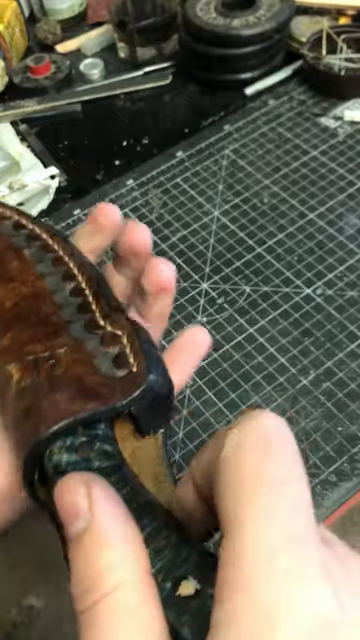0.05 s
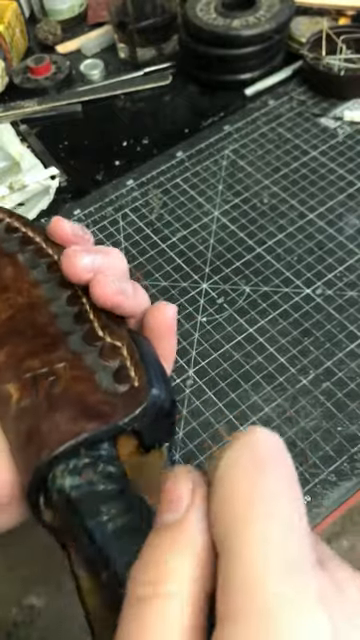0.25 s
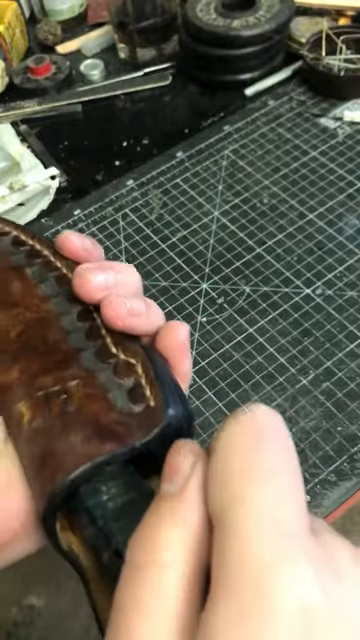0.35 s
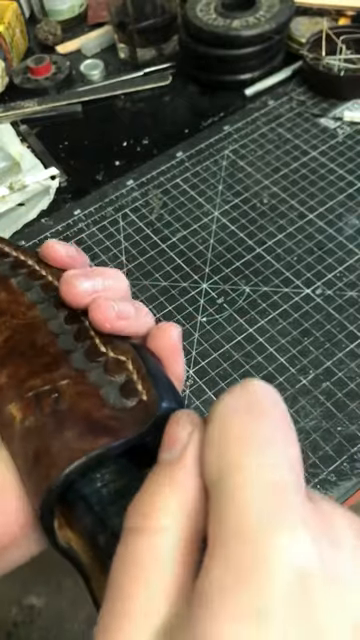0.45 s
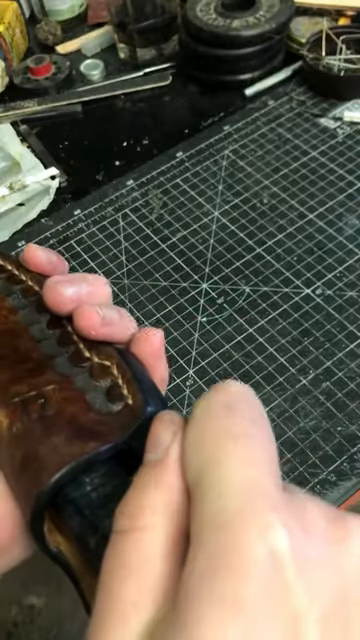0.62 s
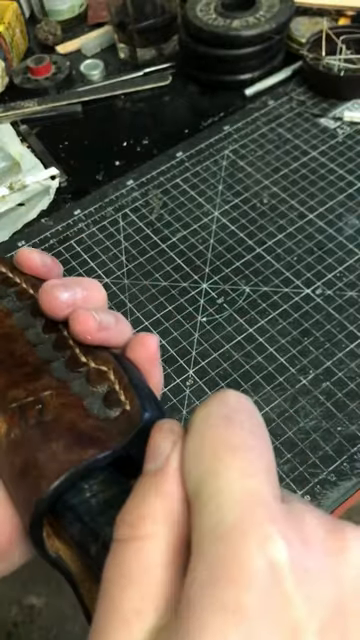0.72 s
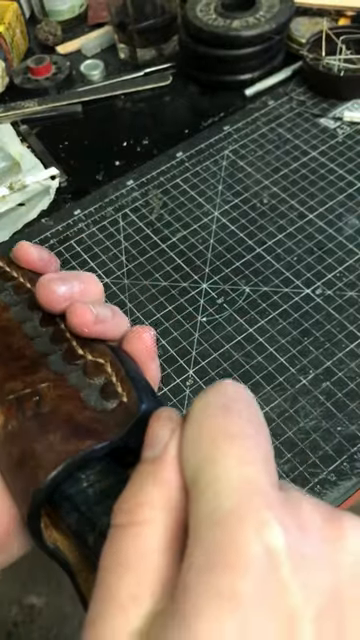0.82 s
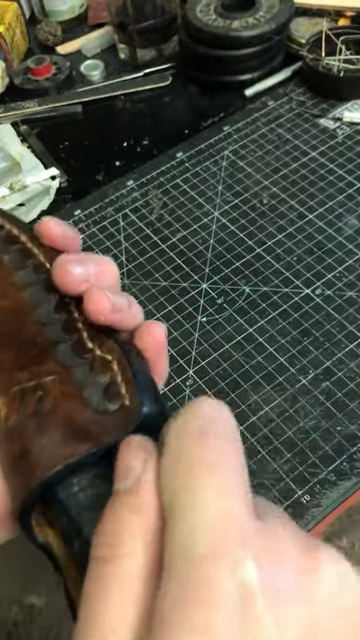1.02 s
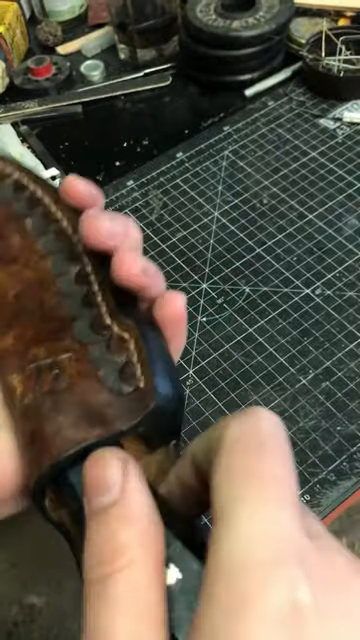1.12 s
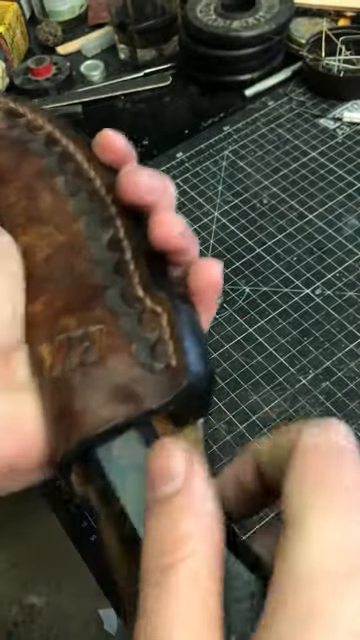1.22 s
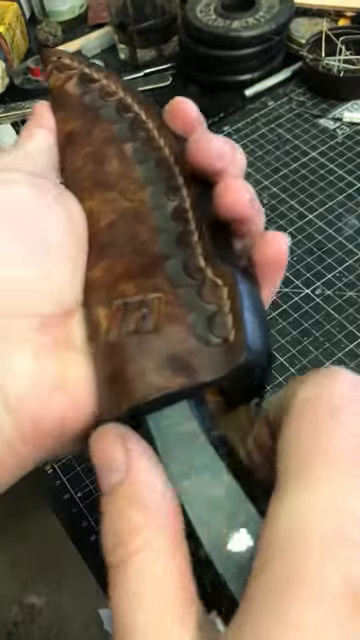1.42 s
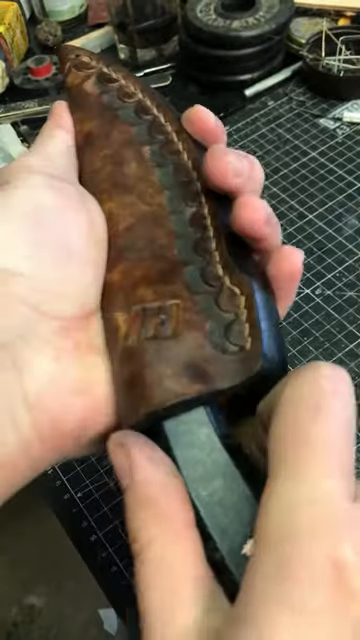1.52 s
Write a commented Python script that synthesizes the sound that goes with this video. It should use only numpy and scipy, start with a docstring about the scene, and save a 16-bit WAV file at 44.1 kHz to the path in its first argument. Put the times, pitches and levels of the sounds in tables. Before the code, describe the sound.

A knife slides into a stiff leather sheath and seats with three sharp snaps.

```python
"""A small workshop, close up over the bench: a knife is pushed into a stiff leather sheath.
The blade hisses over the fibres, catches three times, rasps in tighter and seats with three sharp snaps,
each a slip that cracks, rings the sheath's mouth and thumps its body. Then the fingers shift softly
and ease the blade back out. The room answers with a short tail over a low rumble."""
import sys
import numpy as np
from scipy import signal
from scipy.fft import rfft, irfft, next_fast_len
from scipy.io import wavfile
from scipy.ndimage import map_coordinates

SR = 44100
rng = np.random.default_rng(int(sys.argv[2]) if len(sys.argv) > 2 else 0)


def inscribe(sig):
    """Save sig as 16-bit PCM at rate SR to the path in sys.argv[1].

    A 1-D sig is mono; a 2-D sig holds one channel per row.
    Samples are clipped to [-1, 1] before scaling.
    """
    pcm = np.round(np.clip(np.atleast_2d(sig).T, -1, 1) * 32767)
    wavfile.write(sys.argv[1], SR, pcm.astype(np.int16))


N = 68355

# The knife catches and slips; levels are faders ahead of each layer's shaping:
# (time [s], crack [dB], crack tilt [dB/octave], high cut [Hz], ping [dB], ping pitch [Hz], mouth [dB],
#  thump [dB], thump pitch [Hz], hollow [dB], hollow pitch [Hz], room send [dB])
SLIPS = [(0.2138, -35.5, 0.5, 17200, -21.5, 4420, -24.5, -34.5, 615, -35.5, 1187, -20.5),
         (.2631, -31.5, 0, 16000, -24.5, 3100, -29, -34.5, 550, -37.5, 1170, -20),
         (0.2805, -48, 2, 13000, -29.5, 4200, -46, -49, 610, -45, 1220, -53),
         (0.284, -33, -1, 16000, -30, 3100, -29, -32.5, 970, -36.5, 1370, -14.5),
         (0.2864, -33, -0.5, 19000, -31, 14200, -32, -34, 1050, -31.5, 1410, -24),
         (0.4492, -36, 20, 19000, -31, 15000, -62, -74, 700, -70, 1200, -34),
         (0.45, -21.5, 1, 16900, -13, 9160, -20.5, -22, 750, -31.5, 1640, -9.5),
         (0.6137, -20.5, -.5, 18000, -17.5, 11150, -20, -18.5, 707, -24, 1187, -10),
         (0.8248, -28, -.5, 12700, -25, 6300, -29.5, -24, 554, -41, 1250, -17)]
# The sheath's stiff mouth and its leather body ringing: (pitch [Hz], level [dB], t60 [s])
MOUTH_MODES = [(2190, -18, 0.0089), (2640, -16.5, 0.015), (3626, -0.5, 0.0093), (3890, -4, 0.0079),
               (4526, -6, 0.0069), (6580, -4.5, 0.0044), (9600, -12.5, 0.0078)]
BODY_MODES = [(313.5, -23, 0.04), (530, -19, 0.0063), (860, -14.5, 0.019)]
# EQ of a crack up close, and of a snap as the walls receive it: (frequency [Hz], level [dB])
CRACK_EQ = [(300, -17.5), (1000, 3), (1700, 0.5), (2400, 4.5), (3500, -2), (5200, 1), (6500, 6),
            (8000, -10.5), (10000, -3.5), (13000, 1.5), (16000, -3)]
SNAP_SEND_EQ = [(100, -30), (280, 0), (500, 0), (900, 1), (1400, -1.5), (2000, -4.5), (3600, -4),
                (5200, -9.5), (6500, -9.5), (9000, -17.5), (13000, -16), (16000, -22)]
# Envelopes of the blade sliding in loosely, rasping tight and easing out: (time [s], level [dB])
SLIDE_ENVELOPE = [(0, -54.5), (.04, -53.5), (.07, -52.5), (.108, -52), (.15, -60.5), (.2, -71.5),
                  (.22, -58), (.26, -66), (.29, -79)]
RASP_ENVELOPE = [(.28, -86), (.295, -53.5), (.315, -46.5), (.345, -49.5), (.368, -50), (.388, -45.5),
                 (.398, -52), (.408, -77), (.44, -75)]
DRAW_ENVELOPE = [(1.39, -81), (1.43, -70), (1.465, -80), (1.51, -75), (1.55, -68)]
# EQ of the same three moves: (frequency [Hz], level [dB])
SLIDE_EQ = [(100, -20), (250, -9), (450, -4), (800, -7.5), (1300, -4.5), (2100, -14), (2700, -1.5),
            (3500, -2), (4600, -4.5), (5300, -5.5), (6400, -5), (8500, -9.5), (11800, -5), (16000, -8.5)]
RASP_EQ = [(59, -29), (100, 6.5), (166, -18), (244, -6.5), (365, -28), (461, 4.5), (524, -15), (818, -6),
           (910, -5), (1250, 2), (1580, -6), (3250, -1.5), (4980, -9.5), (6420, -10), (16000, -10.5)]
DRAW_EQ = [(300, -9), (1200, -7), (2200, -8.5), (2900, -6), (3450, 1.5), (4200, -8.5), (5200, -13),
           (9000, -19), (16000, -21)]
# Fingers and handle rub the leather: (centre [s], half length [s], level [dB], tilt [dB/octave])
FINGER_RUBS = [(.385, 0.0099, -51, -8), (.4457, .001, -61, 1), (.605, 0.0011, -60, 3),
               (.993, 0.0014, -62.5, 7), (1.1, .04, -68, 4), (1.152, 0.0026, -59.5, 2),
               (1.169, 0.0058, -60.5, 2), (1.22, 0.015, -69, 1), (1.287, 0.0062, -65, 0.5),
               (1.302, 0.0088, -64.5, 6), (1.445, 0.0085, -68.5, 0), (1.49, .012, -67.5, 4.5),
               (1.545, 0.0091, -67, 1)]
# The hands jostle the sheath: (centre [s], half length [s], level [dB])
HAND_BUMPS = [(.39, .02, -70), (.475, 0.017, -58.5), (.635, 0.017, -56.5), (.85, 0.014, -54),
              (.945, 0.039, -60), (1.015, 0.031, -61), (1.095, 0.0094, -61), (1.15, .02, -62),
              (1.38, 0.009, -60), (1.53, 0.015, -60)]
# EQ of the rubs, the bumps, the reverb and the background rumble: (frequency [Hz], level [dB])
RUB_EQ = [(60, -19), (200, -3), (600, 1.5), (1300, 2), (2100, -11), (3400, -6.5), (5000, -13), (9000, -18),
          (14000, -15), (16000, -17.5)]
BUMP_EQ = [(25, -43), (50, -6), (70, 10), (100, -17), (170, -20.5), (350, -31), (1000, -80), (4000, -120)]
ROOM_EQ = [(100, -1.5), (400, -1), (1400, 0), (3500, -2), (8000, -1), (15000, 1.5)]
RUMBLE_EQ = [(15, -37), (25, -16.5), (80, 2), (195, -9.5), (354, -11.5), (439, -14.5), (1020, -18.5),
             (1190, -23), (2910, -25), (3620, -27), (7710, -30), (14400, -31.5), (16000, -32)]
# The workshop's reverb time: (frequency [Hz], t60 [s])
ROOM_DECAY = [(150, 0.6), (700, 0.44), (2000, 0.36), (5000, 0.3), (14000, 0.25)]

CRACK_T60_S, SPLINTER_T60_S, SPLINTER_DB, SPIKE_DB = 0.0022, 0.014, -6.5, 9.5
PING_T60_S, THUMP_T60_S, HOLLOW_T60_S = 0.0022, 0.0049, 0.01
ATTACK_S, THUMP_LAG_S = 0.00029, 0.00052
MOUTH_CUT_HZ, BODY_CUT_HZ = 1320, 358  # small parts radiate little bass
BEND_DELAY_S, BEND_LOW_HZ = 0.00196, 516  # travel time at 1 kHz; no slower below this pitch
GRAINS_PER_S, FIZZ_HZ = 1600, 7700
ROOM_RISE_S, RUSTLE_SEND_DB, RUMBLE_DB, TOP_HZ = 0.00152, -12.5, -66, 16300


def snaps():
    """Each slip cracks and rings the mouth; the leather thumps, its hollow rings. Gives (direct, send)."""
    direct, send = np.zeros(N + SR), np.zeros(N + SR)
    t = np.arange(SR // 10) / SR
    late = np.maximum(t - THUMP_LAG_S, 0)
    for (time_s, crack_db, tilt_db, top_hz, ping_db, ping_hz, mouth_db,
         thump_db, thump_hz, hollow_db, hollow_hz, send_db) in SLIPS:
        crack = amp(crack_db) * leather_crack(t, tilt_db)
        ping = amp(ping_db) * ring(t, ping_hz, PING_T60_S) * attack(t)  # the contact point itself
        mouth = amp(mouth_db) * sum((-1) ** k * amp(db + rng.normal(0, 1)) * ring(t, hz, t60)
                                    for k, (hz, db, t60) in enumerate(MOUTH_MODES))
        body = sum(amp(db) * ring(late, hz, t60) for hz, db, t60 in BODY_MODES)
        thump = amp(thump_db) * (ring(late, thump_hz, THUMP_T60_S) + body)
        hollow = amp(hollow_db) * ring(late, hollow_hz, HOLLOW_T60_S)
        bite = high_cut(crack + low_cut(mouth + ping, MOUTH_CUT_HZ), top_hz)
        weight = low_cut((thump + hollow) * attack(late), BODY_CUT_HZ)
        start = round(time_s * SR)
        direct[start:start + len(t)] += bending_wave(bite + weight)
        splash = impulse(tilted(SNAP_SEND_EQ, tilt_db))
        send[start:start + len(splash)] += amp(send_db) * splash
    return direct[:N], send[:N]


def leather_crack(t, tilt_db):
    """The leather lets go: a spike, a fast burst of noise and a splintery tail."""
    envelope = fade(t, CRACK_T60_S) + amp(SPLINTER_DB) * fade(t, SPLINTER_T60_S)
    burst = rng.standard_normal(len(t)) * envelope
    burst[0] = amp(SPIKE_DB)
    return signal.lfilter(impulse(tilted(CRACK_EQ, tilt_db)), 1, burst)


def bending_wave(x):
    """High bending waves cross the sheath faster, so a snap's top end arrives first."""
    hz = np.fft.rfftfreq(2 * len(x), 1 / SR)
    delay = BEND_DELAY_S * np.sqrt(1000 / np.maximum(hz, BEND_LOW_HZ))
    phase = 2 * np.pi * hz[1] * np.cumsum(delay - delay[-1])
    return irfft(rfft(x, 2 * len(x)) * np.exp(-1j * phase))[:len(x)]


def blade_friction(envelope, eq, grain_db, fizz_db_per_db):
    """Steel drags over catching leather fibres: a grainy hiss that brightens as it swells."""
    fibres = map_coordinates(rng.standard_normal(N), [np.arange(N) * GRAINS_PER_S / SR])
    level_db = np.interp(np.arange(N) / SR, *np.transpose(envelope), right=-120)
    hiss = unit(amp(grain_db * fibres) * noise(eq))
    fizz = signal.sosfiltfilt(signal.butter(2, FIZZ_HZ, "high", fs=SR, output="sos"), hiss)
    fizz_gain = amp(fizz_db_per_db * (level_db - level_db.max()))
    return amp(level_db) * (hiss + fizz * (fizz_gain - 1))


def handling(touches, eq):
    """Soft contacts of the hands: bell-shaped swells of noise, tilted where the row gives a tilt."""
    out, t = np.zeros(N), np.arange(N) / SR
    for centre_s, half_s, db, *tilt in touches:
        swell = np.exp(-0.5 * ((t - centre_s) / half_s) ** 2)
        out += amp(db) * swell * noise(tilted(eq, *tilt) if tilt else eq)
    return out


def workshop_reverb(send):
    """The walls' diffuse answer, highs dying first; each stretch of sound gets a fresh tail."""
    out, stretch = np.zeros(N + 2 * SR), SR // 7
    for start in range(0, N, stretch):
        hz, t, bands = signal.stft(rng.standard_normal(SR // 2), SR, nperseg=256)
        envelope = fade(t, along(ROOM_DECAY, hz)[:, None]) * (1 - np.exp(-t / ROOM_RISE_S))
        tail = signal.istft(bands * envelope, SR)[1]
        tail = signal.fftconvolve(tail / np.linalg.norm(tail), impulse(ROOM_EQ))
        wet = signal.fftconvolve(send[start:start + stretch], tail)
        out[start:start + len(wet)] += wet
    return out[:N]


def room_tone():
    """A steady bed of low rumble with a faint hiss on top."""
    return amp(RUMBLE_DB) * noise(RUMBLE_EQ)


def amp(db):
    """Decibels to gain."""
    return 10 ** (np.asarray(db) / 20)


def unit(x):
    """Scale to rms 1."""
    return x / np.sqrt(np.mean(x ** 2) + 1e-20)


def along(curve, hz):
    """Read a curve on a log frequency axis."""
    freqs, values = np.transpose(curve)
    return np.interp(np.log(hz + 1), np.log(freqs + 1), values)


def tilted(eq, tilt_db):
    """Lean an EQ about its middle by tilt_db per octave."""
    hz, db = np.transpose(eq)
    return np.column_stack([hz, db + tilt_db * (np.log2(hz) - np.log2(hz).mean())])


def noise(eq):
    """Coloured noise of rms 1."""
    size = next_fast_len(N + 8192)
    gain = amp(along(eq, np.fft.rfftfreq(size, 1 / SR)))
    return unit(irfft(rfft(rng.standard_normal(size)) * gain, size)[:N])


def impulse(eq, size=512):
    """The tightest click with this EQ: minimum phase, energy 1."""
    cepstrum = irfft(np.log(amp(along(eq, np.fft.rfftfreq(size, 1 / SR)))))
    cepstrum[1:size // 2] *= 2
    cepstrum[size // 2 + 1:] = 0
    click = irfft(np.exp(rfft(cepstrum)))
    return click / np.linalg.norm(click)


def attack(t):
    """A fast rise from silence to a gain of 2."""
    return 2 * (1 - np.exp(-t / ATTACK_S))


def fade(t, t60):
    """Exponential decay, 60 dB down at t60."""
    return np.exp(-np.log(1000) * t / t60)


def ring(t, hz, t60):
    """One damped mode."""
    return np.sin(2 * np.pi * hz * t) * fade(t, t60)


def low_cut(x, hz):
    """Thin out the bass, 12 dB per octave."""
    return signal.sosfilt(signal.butter(2, hz, "high", fs=SR, output="sos"), x)


def high_cut(x, hz):
    """Roll off the top, as a softer contact does."""
    return signal.sosfilt(signal.butter(4, hz, "low", fs=SR, output="sos"), x)


def scene():
    """Mono mix: knife, sheath and hands up front, the workshop behind."""
    clicks, snap_send = snaps()
    slide = blade_friction(SLIDE_ENVELOPE, SLIDE_EQ, grain_db=1, fizz_db_per_db=0.76)
    rasp = blade_friction(RASP_ENVELOPE, RASP_EQ, grain_db=-1, fizz_db_per_db=0.11)
    rubs = handling(FINGER_RUBS, RUB_EQ)
    draw = blade_friction(DRAW_ENVELOPE, DRAW_EQ, grain_db=1, fizz_db_per_db=0.11)
    rustle = slide + rasp + rubs + draw
    reverb = workshop_reverb(0.5 * snap_send + amp(RUSTLE_SEND_DB) * rustle)
    bumps = handling(HAND_BUMPS, BUMP_EQ)
    return (clicks + rustle + reverb + bumps + room_tone())[None]


def record(dry):
    """A steep high cut on the whole mix."""
    taps = signal.firwin(201, TOP_HZ, fs=SR, window="blackman")
    return signal.fftconvolve(dry, taps[None], mode="same", axes=1)


dry = scene()
out = record(dry)
inscribe(out)
```